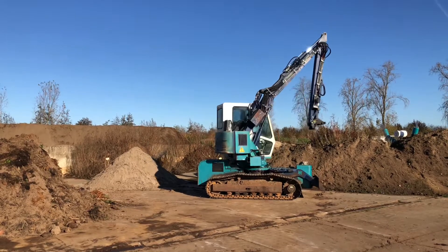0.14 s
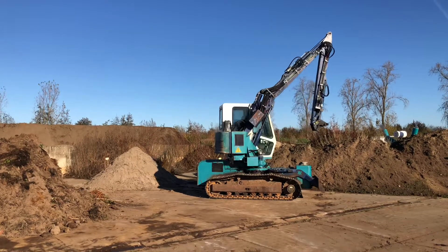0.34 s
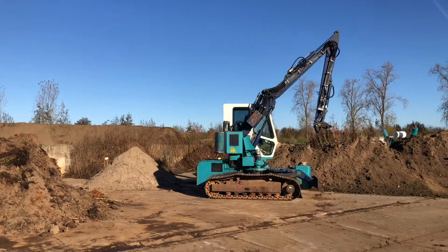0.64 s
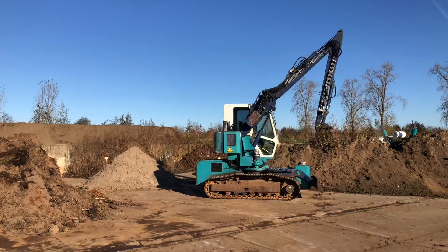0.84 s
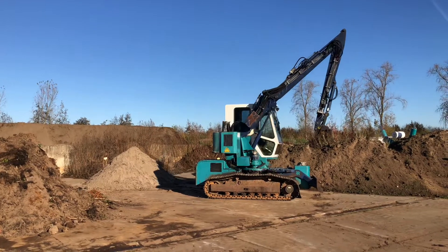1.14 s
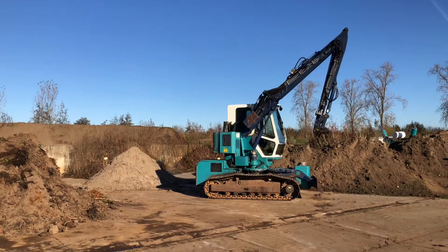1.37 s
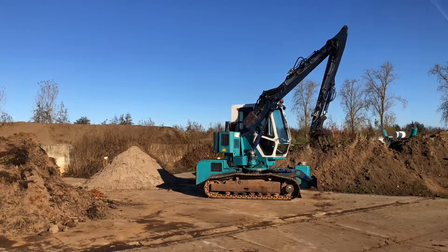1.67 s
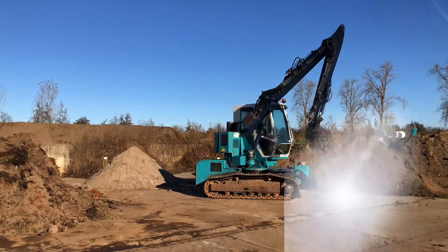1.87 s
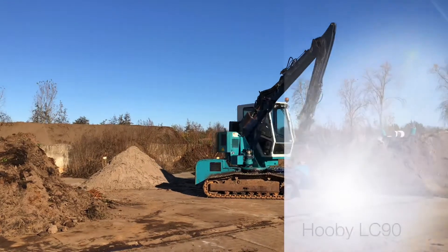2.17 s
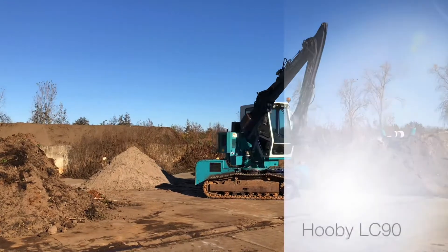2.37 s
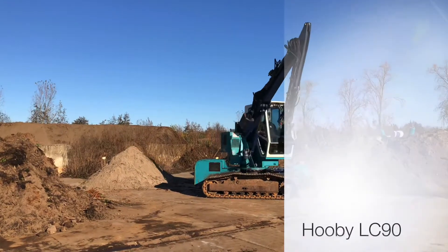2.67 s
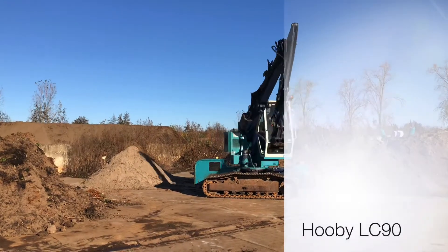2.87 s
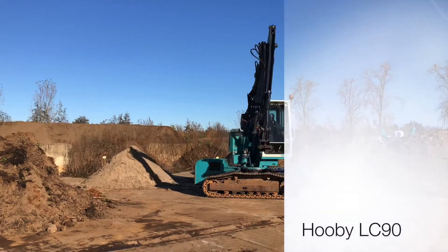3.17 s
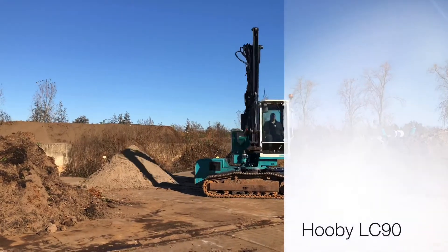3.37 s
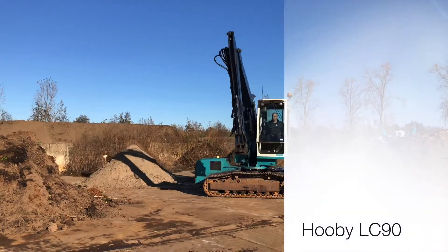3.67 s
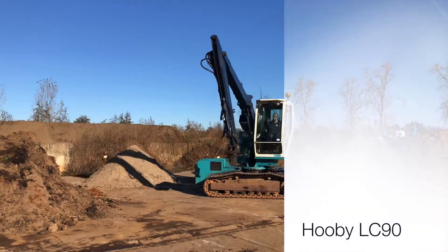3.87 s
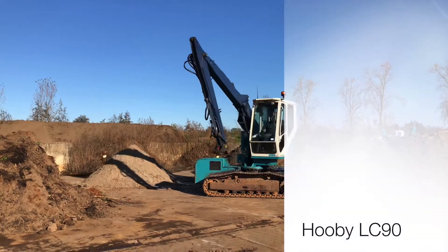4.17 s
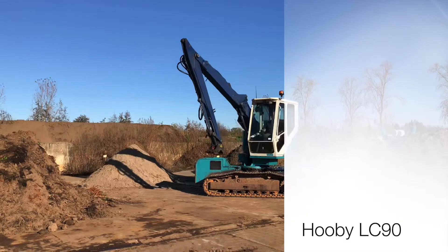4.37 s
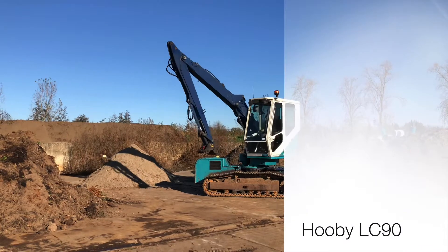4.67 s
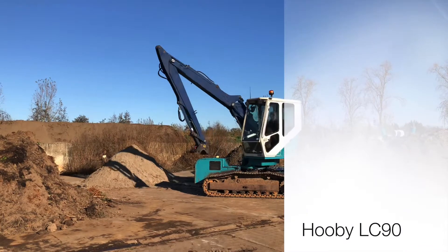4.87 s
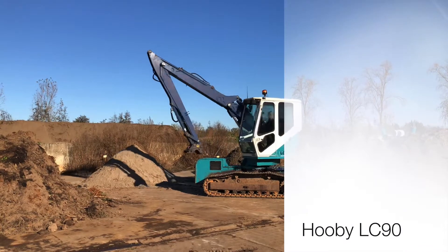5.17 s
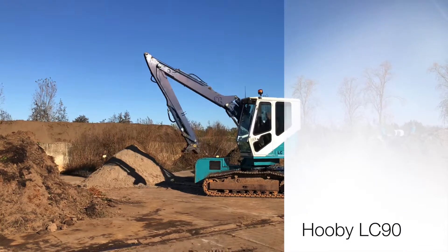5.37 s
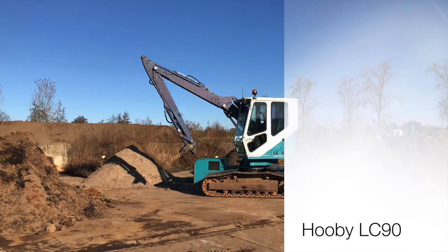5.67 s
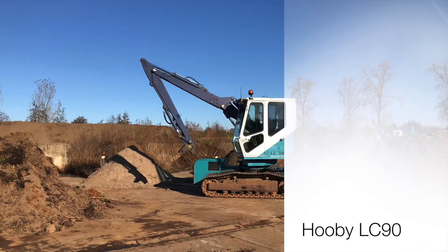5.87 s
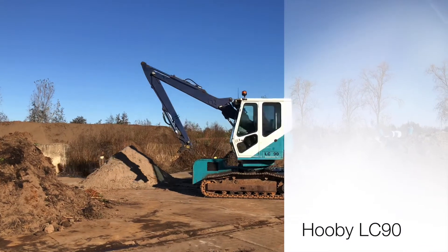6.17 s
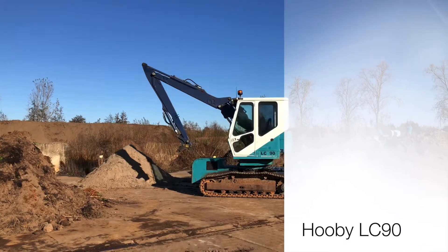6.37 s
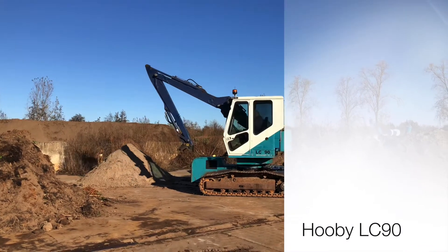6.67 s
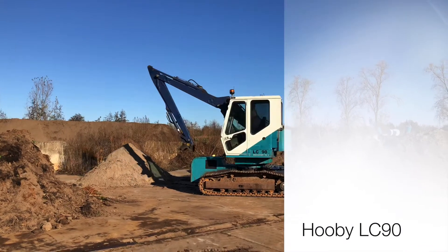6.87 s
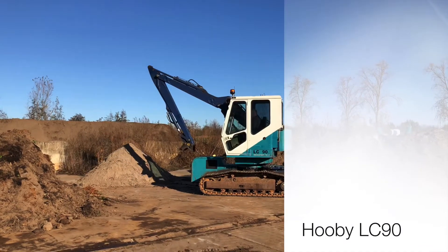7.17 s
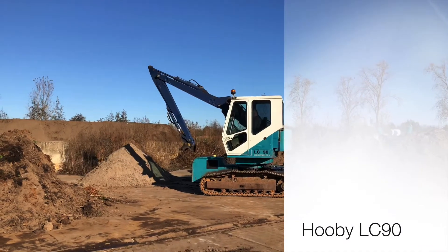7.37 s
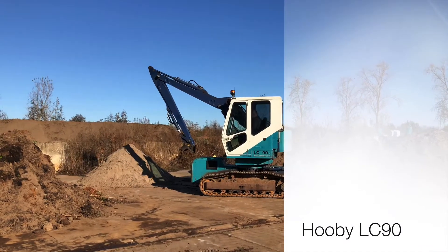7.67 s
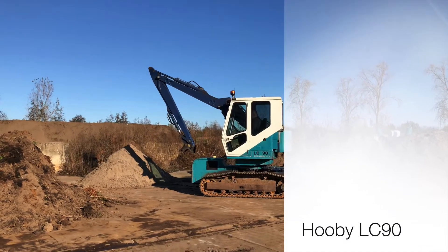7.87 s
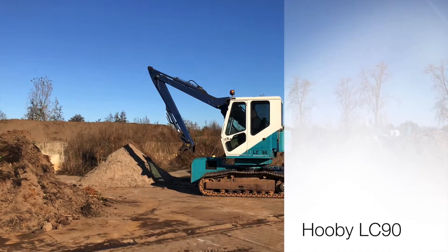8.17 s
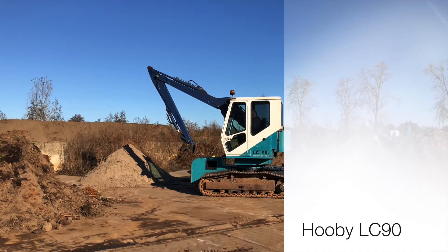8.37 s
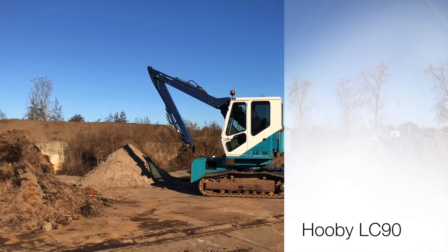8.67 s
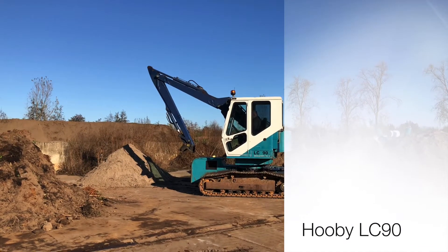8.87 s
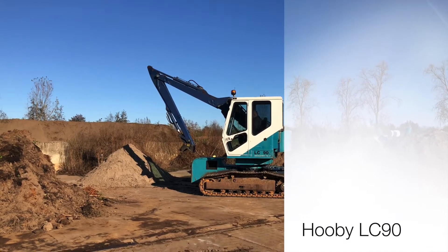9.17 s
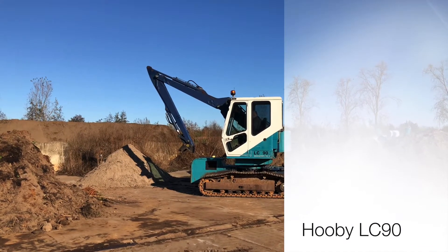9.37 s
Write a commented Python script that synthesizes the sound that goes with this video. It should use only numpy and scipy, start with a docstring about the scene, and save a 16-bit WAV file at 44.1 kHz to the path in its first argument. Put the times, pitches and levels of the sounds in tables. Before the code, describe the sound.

A crawler crane's diesel drones steadily on an open yard, its pitch dipping and surging under load while oil hisses and soft wind thumps the microphone.

```python
"""Crawler crane on an open yard

A crawler crane slews and moves its boom, its four-cylinder diesel held near 2000 rpm by the governor.
Hydraulic loads drag the speed down, harden the exhaust and make the oil hiss; the sound's colour slowly drifts.
Periodic sines and noise gated at the firings make the diesel; shaped noise makes the oil and the breeze.
The fan belt chirps faintly once a lap, and puffs of wind thump dully on the microphone."""
import sys
import numpy as np
from scipy import signal
from scipy.fft import rfft, irfft, next_fast_len
from scipy.io import wavfile
from scipy.ndimage import uniform_filter1d, map_coordinates

SR = 44100
rng = np.random.default_rng(int(sys.argv[2]) if len(sys.argv) > 2 else 0)


def dump_mix(stems):
    """Bounce the given channels to the path in sys.argv[1] as a 16-bit WAV at rate SR."""
    frames = np.atleast_2d(stems).T  # one column per channel
    limited = np.clip(frames, -1, 1)  # hard clip at full scale
    pcm = np.round(limited * 32767).astype(np.int16)
    wavfile.write(sys.argv[1], SR, pcm)


N = 419830

# drift of the crane's sound from its early to its late colour: (time [s], share [0-1])
DRIFT = [(0, 0), (3.8, 0.26), (5.6, 0.46), (7.2, 0.72), (9.52, 0.88)]
# engine hood resonances: (centre [Hz], width [Hz], relative level [dB])
HOOD = [(562.3, 25, -1.5), (685, 44, -6), (843, 71, -8), (957, 21, -8)]
# wind on the microphone: (time [s], relative level [dB], half length [s], upper band edge [Hz])
PUFFS = [(2.02, -21, 0.013, 326), (2.563, -21, .023, 310), (3.899, -30, .04, 355),
         (4.522, -28, .012, 200.1), (5.42, -21.5, .035, 514), (5.471, -13.5, 0.015, 319.4),
         (6.025, -18, 0.011, 197), (6.849, -25.5, .04, 219.8), (7.867, -17.5, 0.012, 519.7),
         (7.889, -10, 0.016, 157), (7.956, -23.5, 0.017, 451.7), (7.997, -18, .015, 334),
         (8.032, -17, 0.013, 170), (8.422, -23, .024, 200), (8.505, -21, 0.017, 330.4),
         (8.539, -17, .01, 170)]
GOVERNED_HZ = 66.7  # firing rate that the governor aims for
GOVERNOR_LAG_S, GOVERNOR_SMOOTH_S = 0.07, 0.093  # the fuel follows the speed error late and softly


def amp(db):
    """Decibels are logarithmic: 20 dB is a tenfold amplitude."""
    return 10 ** (np.asarray(db) / 20)


def unit(x):
    """Normalisation: x at rms 1."""
    return x / np.sqrt(np.mean(x ** 2) + 1e-20)


def curves(rows):
    """Linear interpolation: one value per sample for each column after the time."""
    times, *columns = np.transpose(rows)
    return [np.interp(np.arange(N) / SR, times, column) for column in columns]


def wobble(rate):
    """Band-limited random modulation: a spline through random knots, rate of them a second."""
    coarse = np.arange(0, N + 64, 64)
    knots = rng.standard_normal(int(N * rate / SR) + 4)
    return np.interp(np.arange(N), coarse, map_coordinates(knots, [coarse * rate / SR]))


def filtered(x, response):
    """Linear filtering: the spectrum of x times a response of frequency."""
    size = next_fast_len(N + SR // 4)
    spectrum = rfft(x, size) * response(np.fft.rfftfreq(size, 1 / SR))
    return irfft(spectrum, size)[:N]


def coloured(x, spectrum):
    """Spectral shaping: x through (frequency [Hz], gain [dB]) points on a log axis, at rms 1."""
    f, db = np.transpose(spectrum)
    return unit(filtered(x, lambda hz: amp(np.interp(np.log(hz + 1), np.log(f), db))))


def resonated(x, modes):
    """Modal superposition: x through parallel damped resonators, at rms 1."""
    def response(f):
        return sum(amp(db) * 1j * f * width / (centre * centre - f * f + 1j * f * width)
                   for centre, width, db in modes)
    return unit(filtered(x, response))


def ringing(x, share, t60):
    """Modal overlap: the many close modes of steel panels ring as noise decaying 60 dB in t60 seconds."""
    t = np.arange(SR // 20) / SR
    tail = rng.standard_normal(len(t)) * amp(-60 * t / t60)
    tail /= np.linalg.norm(tail)
    return unit(x + share * signal.fftconvolve(x, tail)[:N])


def combustion(firings, repeat, depth, scatter_db):
    """Cyclostationary noise: a burst at each firing, one share repeating every four, the rest new each time."""
    pattern = rng.standard_normal(2048)
    cyclic = np.interp(firings / 4 % 1, np.linspace(0, 1, len(pattern)), pattern)
    share = np.clip(repeat, 0, 1)
    sizes = amp(scatter_db * rng.standard_normal(1024))[firings.astype(int)]
    gate = 1 + depth * sizes * np.exp(-4 * (firings % 1))
    return gate * (np.sqrt(share) * unit(cyclic) + np.sqrt(1 - share) * rng.standard_normal(N))


def governor(firing_hz):
    """Delayed feedback: how far the speed lies below its aim [Hz], as the fuel pump feels it."""
    t = np.arange(N) / SR
    sag = uniform_filter1d(GOVERNED_HZ - firing_hz, max(int(GOVERNOR_SMOOTH_S * SR), 1))
    return np.interp(t - GOVERNOR_LAG_S, t, sag)


def level(law, sag):
    """Load dependence: a level [dB] drifts from early to late, rises under load and drops on overrun.

    law: (early [dB], midway [dB], late [dB], gain per Hz of sag [dB], loss per Hz of overrun [dB])
    """
    *by_drift_db, load_db, overrun_db = law
    drift, = curves(DRIFT)
    drift_db = np.interp(drift, [0, 0.5, 1], by_drift_db)
    return drift_db + load_db * np.maximum(sag, 0) + overrun_db * np.minimum(sag, 0)


def exhaust(firings, load, tone_db):
    """Harmonic radiation: firing tone, weaker lines of unequal cylinders and fan, a rough muffler drone."""
    # lines: (multiple of the firing rate, early level [dB], late level [dB])
    notes = [(1.5, -34, -39.5), (2, -42.5, -43), (2.5, -41.5, -38.5), (3, -47.5, -38), (3.38, -44.5, -45.5),
             (3.5, -43, -44), (4, -45, -43.5), (4.12, -46, -46), (4.5, -50, -58), (5, -56.5, -54.5),
             (5.5, -54, -60), (6, -56, -57), (6.5, -61, -53.5), (7, -56.5, -61), (8, -55.5, -56),
             (8.5, -55, -55.5), (9, -61, -56), (10, -55, -61.5), (10.5, -55, -59), (13, -57, -76),
             (14, -55.5, -59.5)]
    # drone in the muffler: (frequency [Hz], gain [dB])
    muffler = [(20, -31), (45, -20), (65, 9), (100, -9), (130, 7.5), (165, -3.5), (200, 3), (230, 1),
               (285, 1.5), (320, -13.5), (450, -16), (900, -57)]
    drift, = curves(DRIFT)
    lines = np.zeros(N)
    for order, early_db, late_db in notes:
        # load hardens the pulses, above all their second harmonic
        load_db = 13 if order == 2 else 1.5
        line_db = early_db + drift * (late_db - early_db) + load_db * load + 1.1 * wobble(5)
        if order < 2:  # the lowest line fades with the firing tone
            line_db = line_db + 0.32 * np.minimum(tone_db + 26.5, 0)
        phase = 2 * np.pi * (order * firings + rng.random()) + 0.17 * wobble(12)
        lines += amp(line_db) * np.sin(phase)

    def hood_gain(f):
        return 1 + sum(amp(db) / (1 + (2 * (f - hz) / width) ** 2) for hz, width, db in HOOD)
    lines = filtered(lines, hood_gain)  # a line swells as it crosses a resonance of the hood
    tone = amp(tone_db + 0.48 * wobble(24)) * np.sin(2 * np.pi * firings)
    drone = coloured(combustion(firings, repeat=0.028, depth=0.47, scatter_db=2.5), muffler)
    drone_db = -37.5 + 3 * load + 0.6 * drift + 0.47 * wobble(6.9)
    return np.sqrt(2) * (tone + lines) + amp(drone_db) * drone


def firing_tone(firing_hz, sag):
    """Torque dependence: the tone [dB] is strong as the engine pulls up, weak as it slows, overruns or lugs."""
    # firing tone at steady speed: (time [s], level [dB])
    boom = [(0, -24.2), (1.8, -21.5), (3.85, -22.5), (4.2, -26), (6.0, -28.5), (6.15, -24.5), (6.45, -23),
            (7.1, -28.5), (9.52, -28.5)]
    pull_db, pull_lag_s = 0.115, 0.015  # dB gained per Hz/s of pull, a little late
    overrun_db = 0.9  # lost per Hz above the governed speed, where the fuel is cut
    lug_hz, lug_db = 8.3, 6.5  # lost when the engine lugs this far below it
    t = np.arange(N) / SR
    steady_db, = curves(boom)
    pull = uniform_filter1d(np.gradient(firing_hz) * SR, max(int(GOVERNOR_SMOOTH_S * SR), 1))
    late_pull = np.interp(t - pull_lag_s, t, pull)
    overrun = np.maximum(-sag, 0)
    lug = np.maximum(GOVERNED_HZ - firing_hz, 0)
    return steady_db + pull_db * late_pull - overrun_db * overrun - lug_db * (lug / lug_hz) ** 2


def engine(firings, block_db, clatter_db):
    """Structure-borne sound: combustion shakes block and hood; injectors and valves rattle the casing."""
    # radiation of block, then of casing: (frequency [Hz], gain [dB])
    block_spectrum = [(200, -36), (320, -0.5), (400, 1), (470, 1), (550, 3), (620, 1.5), (680, 3.5),
                      (760, 2.5), (900, -0.5), (1100, 2), (1350, 0), (1700, -2.5), (2300, -13.5),
                      (3200, -50)]
    casing_spectrum = [(900, -16), (1400, -0.5), (2000, 4.5), (2450, 2), (2720, 3.5), (2890, 6), (3050, 0),
                       (3300, -3), (3700, -10.5), (4300, -32.5)]
    block = coloured(combustion(firings, repeat=0.33, depth=0.15, scatter_db=2), block_spectrum)
    shaking = coloured(rng.standard_normal(N), [(300, -17), (500, -0.5), (1000, -1.0), (1500, -31)])
    hood = resonated(shaking, HOOD)
    rattle = coloured(combustion(firings, repeat=0.16, depth=0.14, scatter_db=4), casing_spectrum)
    casing = ringing(rattle, share=0.18, t60=0.04)
    return amp(block_db + 1.0) * block + amp(block_db - 6) * hood + amp(clatter_db + 5.5) * casing


def hydraulics(firings, laps, sag, flow_db):
    """Flow noise and forced resonance: oil hisses in the valves, the pump rings its housing.

    The whirr throbs once a belt lap; spray and fizz flutter twice a lap."""
    # ringing pump housing and pipes: (centre [Hz], width [Hz], relative level [dB])
    panels = [(1605, 55, 0), (1745, 80, -2), (1915, 60, -2), (2046, 60, -5), (2166, 60, -4)]
    # spectra of hiss, spray and valve fizz: (frequency [Hz], gain [dB])
    oil_spectrum = [(3000, -18), (3800, -5.5), (4300, -1.5), (5200, 3), (5800, 1), (6400, -2.5),
                    (7500, -24)]
    spray_spectrum = [(5500, -33), (6500, -3), (7000, 1), (8000, -0.5), (9400, 0), (10200, -9),
                      (11200, -20), (13000, -32)]
    valve_spectrum = [(9000, -42), (11500, -12), (13000, 1), (15800, 1)]
    # flutter of the valve fizz: (time [s], depth [0-1])
    flutter_depth = [(0, 0), (1.5, 0), (1.9, 0.39), (2.7, 0.31), (3, 0.2), (9.52, .05)]
    # level laws before trims: columns as in level()
    pump_law = (-41, -41.5, -40.5, 0.03, 0.6)
    hiss_law = (-57, -60, -61, 1.25, 0.3)
    spray_law = (-57, -59, -61, 1.26, .5)
    fizz_law = (-65, -71, -73, .9, 0)
    slew_stop_s, release_s, idle_db = 6.87, 0.066, -5.5  # the pump unloads when the slewing ends
    stopped = (1 + np.tanh((np.arange(N) / SR - slew_stop_s) / release_s)) / 2
    pump_db = level(pump_law, sag) + idle_db * stopped
    hiss_db, spray_db, fizz_db = [level(law, sag) + flow_db for law in (hiss_law, spray_law, fizz_law)]

    pulses = combustion(firings, repeat=0.45, depth=0.079, scatter_db=5)
    ripple = coloured(pulses, [(900, -33), (1500, 3.5), (2300, 0.5), (2900, -8)])
    whirr = amp(pump_db - 2.5 + 1.96 * np.sin(2 * np.pi * laps)) * resonated(ripple, panels)

    depth, = curves(flutter_depth)
    flutter = 1 + depth * np.sin(2 * np.pi * 2 * laps)
    hiss = ringing(coloured(rng.standard_normal(N), oil_spectrum), share=0.28, t60=0.05)
    spray = ringing(coloured(rng.standard_normal(N), spray_spectrum), share=0.35, t60=0.03)
    fizz = coloured(rng.standard_normal(N), valve_spectrum)
    oil = amp(hiss_db + 0.9 + 0.9 * wobble(22)) * hiss
    oil += amp(spray_db + 1.1 * wobble(18)) * flutter ** 0.34 * spray
    oil += amp(fizz_db + 2.5 + 0.8 * wobble(9)) * flutter * fizz
    return whirr + oil


def belt(laps, slip_db):
    """Stick-slip friction: a glazed patch of the fan belt chirps on its pulley once a lap, never twice alike."""
    # belt modes: (centre [Hz], half width to 1/e [Hz], relative level [dB])
    chirp = [(6770, 62, -11), (7020, 74, -3), (7300, 84, -6.5), (8530, 150, -10)]
    lap = laps.astype(int)
    out = np.zeros(N)
    for hz, width, db in chirp:
        size, shift = rng.standard_normal((256, 2))[lap].T
        contact = np.exp(-((laps % 1 - 0.5 - 0.16 * shift) / 0.15) ** 2)
        squeal = filtered(rng.standard_normal(N), lambda f: np.exp(-((f - hz) / width) ** 2))
        out += amp(slip_db + db + 2.5 + 3 * size) * contact * unit(squeal)
    return out


def wind():
    """Turbulent pressure: each puff is a brief swell of low eddies with its own upper band edge."""
    t = np.arange(-SR // 5, SR // 5) / SR
    out = np.zeros(N + SR)
    for s, db, length, edge_hz in PUFFS:
        band = signal.butter(3, [52, edge_hz], "bandpass", fs=SR, output="sos")
        # large eddies push hardest
        large = signal.butter(1, [45, 45 + 0.3 * edge_hz], "bandpass", fs=SR, output="sos")
        swell = np.exp(-0.5 * (t / length) ** 2)
        flow = unit(signal.sosfilt(np.vstack([band, large]), rng.standard_normal(len(t))))
        eddies = swell * np.tanh(0.71 * flow)  # soft limiting
        puff = amp(db - 2.5) * unit(eddies) * np.sqrt(np.mean(swell ** 2))
        out[round((s + t[0]) * SR):][:len(t)] += puff
    return out[:N]


def rumble():
    """Low-frequency turbulence: the breeze rumbles on the microphone and swells around each puff."""
    # breeze: (frequency [Hz], gain [dB])
    breeze_spectrum = [(15, -16), (28, 2), (45, 17), (60, -15), (110, -42)]
    breeze_db, swing_db = -53, 3.5  # between puffs
    around_db, around_s = -34, 0.13  # around a puff: level against its tabled level, half length
    t = np.arange(N) / SR
    swells = sum(amp(db + around_db) ** 2 * np.exp(-((t - s) / around_s) ** 2) for s, db, _, _ in PUFFS)
    breeze = amp(breeze_db + swing_db * wobble(3.3))
    return np.sqrt(breeze ** 2 + swells) * coloured(rng.standard_normal(N), breeze_spectrum)


def scene():
    """Common drive: one crankshaft turns exhaust, engine noise, pump and belt; its sag shifts their levels."""
    # engine speed: (time [s], firing rate [Hz])
    speed = [(0, 64.8), (.12, 62.76), (.3, 62.8), (.55, 67.2), (.82, 69.4), (1.3, 62.87), (1.6, 67.52),
             (1.95, 67.55), (2.15, 65.99), (3.85, 66.5), (4.11, 72.64), (4.28, 65.63), (4.48, 63.2),
             (4.59, 56.8), (4.93, 72.86), (5.03, 66.86), (5.45, 66.8), (5.6, 65.08), (5.85, 64.95),
             (6.15, 66.9), (6.65, 66.85), (6.95, 69.62), (7.25, 66.7), (9.52, 66.98)]
    # oil flow through the valves: (time [s], relative level [dB])
    oil_flow = [(0, -1), (2.4, 1), (3.6, -0.5), (5.4, 0.5), (5.8, 2), (6.05, -1.5), (6.5, -2), (6.72, 1.5),
                (7.05, 0.5), (8.5, -0.5), (9.52, -3.5)]
    # level laws before trims: columns as in level()
    block_law = (-41.5, -42.5, -44.5, 0.74, 0.34)
    clatter_law = (-52.5, -55, -53.5, 0.74, 0.56)
    chirp_law = (-58.5, -63, -69.5, .5, 0.7)
    firing_hz, = curves(speed)
    flow_db, = curves(oil_flow)
    firings = np.cumsum(firing_hz) / SR
    laps = 0.1566 * firings  # belt laps per firing
    sag = governor(firing_hz)
    load = np.clip((66 - firing_hz) / 4.0, 0, 1)  # the governor droops under load
    # the clatter follows the flow by 0.92 dB per dB
    clatter_db = level(clatter_law, sag) + 0.92 * flow_db + 0.75 * wobble(14)
    mix = exhaust(firings, load, firing_tone(firing_hz, sag))
    mix += engine(firings, level(block_law, sag), clatter_db)
    mix += hydraulics(firings, laps, sag, flow_db)
    mix += belt(laps, level(chirp_law, sag))
    mix += wind() + rumble()
    return mix[None]


def record(dry):
    """Band limitation: nothing at or above 15750 Hz passes."""
    return filtered(dry[0], lambda hz: hz < 15750)[None]


dry = scene()
out = record(dry)
dump_mix(out)
```